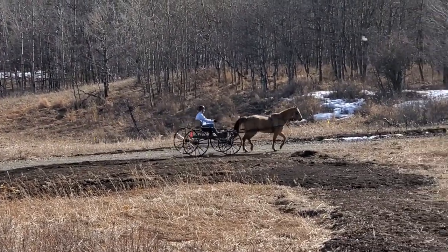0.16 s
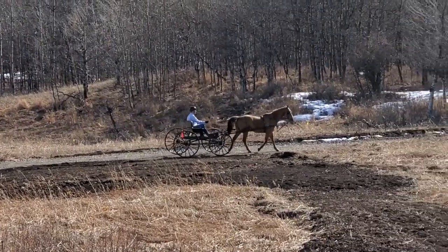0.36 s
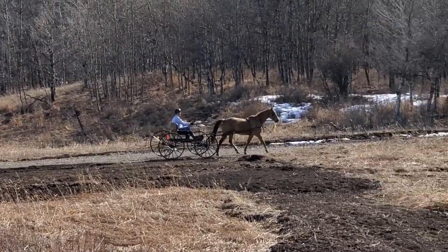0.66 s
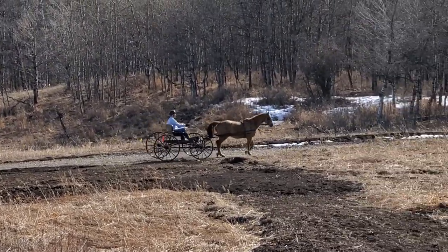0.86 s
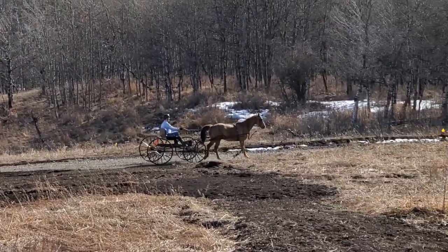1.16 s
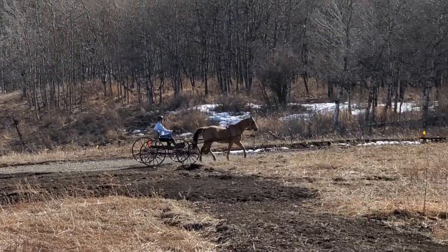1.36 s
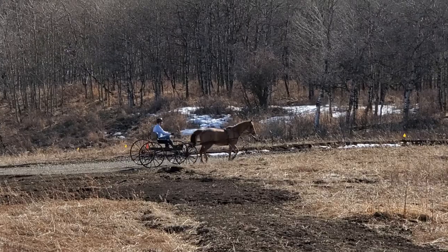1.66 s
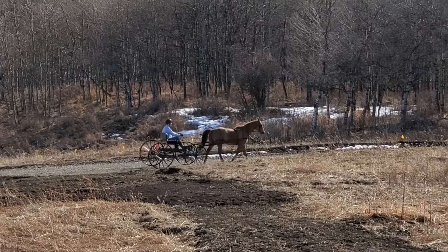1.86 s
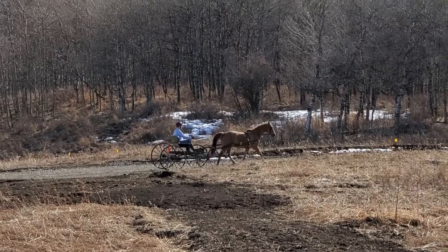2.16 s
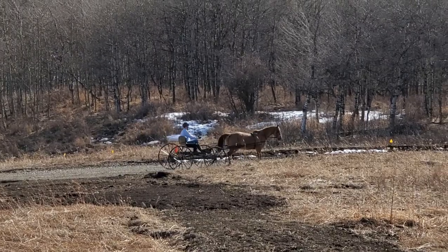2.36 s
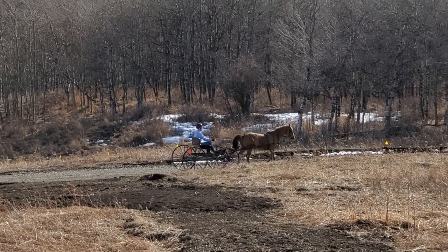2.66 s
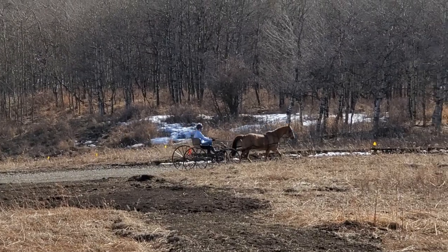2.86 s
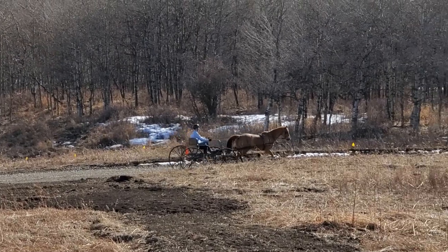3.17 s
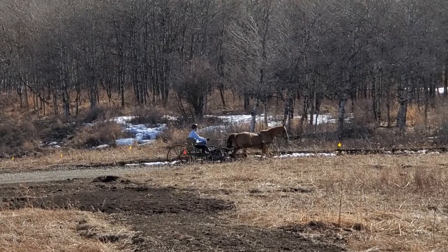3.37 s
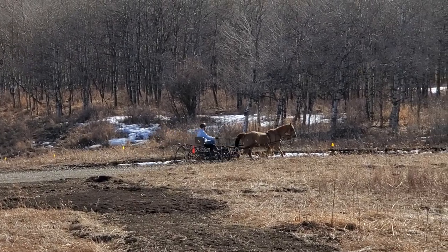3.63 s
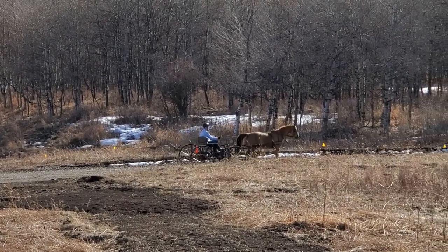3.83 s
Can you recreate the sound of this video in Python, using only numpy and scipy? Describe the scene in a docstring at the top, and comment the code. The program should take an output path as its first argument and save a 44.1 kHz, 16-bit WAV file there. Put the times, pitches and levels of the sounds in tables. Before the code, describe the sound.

Gusty wind rumbles on the microphone while a distant horse pulls a buggy along gravel.

```python
"""Wind buffets the left and right microphone ports with deep thumps and flutter, while some way off
a horse trots along a gravel road, drawing a light buggy. Hooves crush the stones and ring their iron
shoes, the wheels crunch steadily and loose fittings clink. The woods rush behind, a late gust stirs
the dry grass, a few stalks tick close by and the microphones add a faint hiss."""
import sys
import numpy as np
from scipy import signal
from scipy.fft import rfft, irfft, next_fast_len
from scipy.io import wavfile
from scipy.ndimage import uniform_filter1d, map_coordinates

SR = 44100
rng = np.random.default_rng(int(sys.argv[2]) if len(sys.argv) > 2 else 0)


def int16_out(signal):
    """Quantize to a 16-bit WAV file."""
    q = np.round(np.clip(np.atleast_2d(signal).T, -1, 1) * 32767)
    wavfile.write(sys.argv[1], SR, q.astype(np.int16))


N = 176400

# hooves striking and scuffing the gravel (time [s], level [dB], length [s])
FOOTFALLS = [(.342, -73, 0.0095), (0.612, -66.5, 0.017), (0.762, -65, 0.016), (1.093, -63.5, 0.018),
             (1.131, -66, 0.027), (1.544, -68.5, 0.017), (1.711, -66, 0.016), (1.733, -52, 0.0096),
             (1.744, -51, 0.0068), (1.777, -60, 0.0078), (1.882, -67.5, 0.0062), (2.031, -60, 0.006),
             (2.084, -65.5, 0.036), (2.202, -65, 0.016), (2.228, -56.5, 0.015), (2.262, -60, 0.011),
             (2.29, -62.5, 0.0075), (2.406, -63.5, 0.017), (2.55, -55, 0.0029), (2.602, -62, 0.017),
             (2.811, -67, 0.024), (3.19, -84, 0.0035), (3.311, -66, 0.0079), (3.775, -62.5, 0.029)]
HOOF_ATTACK_S = .0035


def amp(db):
    """Decibels to gain."""
    return 10 ** (np.asarray(db) / 20)


def unit(x):
    """Scale to rms 1."""
    return x / np.sqrt(np.mean(x ** 2) + 1e-20)


def along(points, hz):
    """Read (frequency, value) points on a log frequency axis."""
    freqs, values = np.transpose(points)
    return np.interp(np.log(hz + 1), np.log(freqs + 1), values)


def curve(rows):
    """An envelope through (time, value) points, one value per sample."""
    return np.interp(np.arange(N) / SR, *np.transpose(rows))


def wobble(per_s):
    """A smooth random curve with per_s knots a second."""
    return map_coordinates(rng.standard_normal(2048), [np.arange(N) * per_s / SR], mode="wrap")


def filtered(x, response):
    """Equalise x by a gain given as a function of frequency."""
    size = next_fast_len(N + SR // 4)
    return irfft(rfft(x, size) * response(np.fft.rfftfreq(size, 1 / SR)), size)[..., :N]


def noise(colour):
    """Coloured noise, rms 1."""
    return unit(filtered(rng.standard_normal(N), lambda hz: amp(along(colour, hz))))


def white_pair():
    """Two unrelated white noises."""
    return rng.standard_normal((2, N))


def stereo(pair, colour, correlation):
    """Colour two unrelated signals and blend them as mid and side into left and right, rms 1."""
    def response(hz):
        angle = np.arccos(np.clip(along(correlation, hz), -1, 1)) / 2
        return amp(along(colour, hz)) * np.array([np.cos(angle), np.sin(angle)])
    mid, side = filtered(pair, response)
    return unit(np.array([mid + side, mid - side]))


def patchy(pair, depth_db, size=1024, frames=14):
    """Mottle a pair of signals with patches of gain that drift in time and frequency."""
    spectra = signal.stft(pair, nperseg=size)[2]
    patches = uniform_filter1d(rng.standard_normal(spectra.shape[1:]), size=5, axis=0)
    patches = uniform_filter1d(patches, size=frames, axis=1)
    return signal.istft(spectra * amp(depth_db * unit(patches)), nperseg=size)[1][:, :N]


def hiss():
    """Faint microphone hiss swells and sinks, coloured differently on each side."""
    # swell shared by both sides (time [s], level [dB])
    swell = [(0, -83), (.22, -78), (.3, -80), (.57, -82), (.65, -79), (1.4, -77.5), (1.68, -84),
             (1.92, -81.5), (2.0, -76), (2.15, -80), (2.55, -78), (2.8, -81.5), (3.25, -75.5),
             (3.55, -78.5), (3.65, -74), (3.82, -74), (3.92, -78)]
    # tone of each side (frequency [Hz], gain [dB])
    left_colour = [(4000, -27), (7500, -11), (10000, -6), (13000, -3.5), (15500, 3.5)]
    right_colour = [(4000, -42), (8000, -36), (9800, -29), (10600, 0), (11300, -0.5), (12200, -12),
                    (15500, -15.5)]
    sides = np.array([amp(10) * noise(left_colour), amp(3.5) * noise(right_colour)])
    return amp(curve(swell) + .78 * wobble(18)) * sides


def woods():
    """The far woods rush, a little to the left, with a hollow note that comes and goes."""
    # swells of the breathy rush and of the hollow note (time [s], level [dB])
    rush_swell = [(0, -61), (.25, -56.5), (.52, -60), (.82, -59.5), (.91, -66), (1.08, -58.5), (1.25, -61),
                  (1.38, -58), (1.7, -62), (1.82, -59.5), (1.94, -65), (2.08, -55.5), (2.17, -60.5),
                  (2.55, -60.5), (2.7, -65), (2.95, -61.5), (3.8, -62.5), (4, -63.5)]
    hollow_swell = [(0, -59), (.5, -75), (1.05, -67.5), (1.9, -63.5), (2.15, -68), (2.45, -62), (2.75, -69),
                    (3.15, -61.5), (3.8, -59), (4, -65)]
    # their tone (frequency [Hz], gain [dB])
    rush_colour = [(150, -6), (300, -12), (420, -22.5), (520, -13), (620, -4), (725, 1.5), (820, -1.5),
                   (1000, -4), (1200, -9.5), (1450, -19.5), (2400, -39), (5000, -53)]
    hollow_colour = [(300, -69), (500, -9), (580, -0.5), (635, 6), (690, 2.5), (760, -33.5), (1100, -37.5)]
    # stereo image of both (frequency [Hz], left-right correlation [-1..1])
    image = [(400, 0.64), (700, 0.97), (900, 0.45), (1050, 0.38), (1300, -0.55), (2000, 0.24), (2500, .3)]
    rush = amp(curve(rush_swell) + .5) * stereo(patchy(white_pair(), depth_db=1.5), rush_colour, image)
    hollow = amp(curve(hollow_swell)) * stereo(white_pair(), hollow_colour, image)
    return (rush + hollow) * amp([[.75], [-.75]])


def grass():
    """Dry grass rustles, most of all in the late gust."""
    # swell of the rustle (time [s], level [dB])
    swell = [(0, -81.5), (.6, -66), (1.6, -77), (2.6, -65.5), (3.0, -59.5), (3.3, -59.5), (3.5, -64.5),
             (3.8, -59.5), (4, -64.5)]
    # its tone (frequency [Hz], gain [dB])
    colour = [(500, -5.5), (1050, 2), (1350, -2), (1750, -2), (2300, -20.5), (3200, -30.5), (6000, -17.5),
              (10000, -40)]
    # its stereo image (frequency [Hz], left-right correlation [-1..1])
    image = [(900, -0.33), (1300, -0.49), (1800, -0.059), (2400, 0.58), (4000, -0.046)]
    envelope = amp(curve(swell) + .71 * wobble(30))
    return envelope * stereo(patchy(white_pair(), depth_db=2.96), colour, image)


def stalks():
    """Stalks tick near the microphones: thin, dry snaps of band-passed noise."""
    # snaps (time [s], level [dB], pitch [Hz])
    snaps = [(0.185, -62.5, 11000), (0.61, -64, 10500), (0.763, -57.5, 5000), (2.232, -65.5, 7300),
             (2.407, -62, 5800), (3.612, -61, 4700), (3.653, -61, 4760), (3.782, -60, 6070)]
    t60_s, width_oct = .057, .39
    out = np.zeros((2, N))
    for start, db, pitch_hz in snaps:
        t = np.arange(N) / SR - start
        band = lambda hz: np.exp(-.5 * (np.log2((hz + 1) / pitch_hz) / width_oct) ** 2)
        out += (t > 0) * amp(db - 60 * np.abs(t) / t60_s) * unit(filtered(white_pair(), band))
    return out


def eddies(colour):
    """Low turbulence, compressed to a nearly even strength, rms 1."""
    rumble = noise(colour)
    power = uniform_filter1d(np.abs(signal.hilbert(rumble)) ** 2, size=900)
    power = np.abs(uniform_filter1d(power, size=900))
    return unit(rumble / np.sqrt(power + .23))


def wind():
    """Wind flickers on each port and puffs slap it; the harder it blows, the more flutter over the thump."""
    # wind strength on each port (time [s], level [dB])
    left_gusts = [(0, -54.5), (.09, -43), (.24, -52), (.31, -62), (.42, -42.5), (.52, -52.5), (.56, -34),
                  (.62, -44), (.74, -31.5), (.88, -56), (1.0, -46), (1.06, -19), (1.13, -27.5),
                  (1.19, -52.5), (1.46, -53), (1.57, -41.5), (1.68, -50), (1.85, -62.5), (1.92, -44.5),
                  (2.15, -79), (2.22, -39), (2.38, -34.5), (2.57, -38), (2.85, -47), (2.94, -33.5),
                  (3.38, -26), (3.58, -52), (3.63, -42), (3.8, -36.5), (4, -43.5)]
    right_gusts = [(0, -63), (.24, -40), (.3, -45), (.5, -55.5), (.68, -49), (.73, -32), (.93, -65),
                   (.99, -28.5), (1.04, -20.5), (1.08, -31.5), (1.2, -37), (1.3, -48), (1.86, -54.5),
                   (2.06, -36), (2.18, -44.5), (2.34, -38.5), (2.4, -40.5), (2.62, -44), (2.84, -46.5),
                   (2.9, -31), (3.3, -30.5), (3.52, -40), (3.7, -33.5), (4, -51)]
    # sudden puffs (peak time [s], half-width [s], level [dB], port [-1 left, 1 right])
    puffs = [(.075, 0.01, -36.5, -1), (0.174, 0.007, -34, -1), (0.707, 0.0057, -26.5, -1),
             (1.026, 0.016, -21, 1), (2.067, 0.0083, -28, 1), (2.335, 0.011, -22.5, -1),
             (2.38, 0.014, -15, -1), (2.466, 0.007, -28, 1), (2.593, 0.021, -31, -1),
             (2.972, 0.028, -24.5, -1), (3.038, 0.006, -20, -1), (3.093, 0.011, -18, -1),
             (3.247, 0.016, -20, -1), (3.3, 0.021, -25.5, -1), (3.413, 0.014, -20, -1),
             (3.564, 0.013, -27, 1), (3.708, 0.0054, -20, 1), (3.786, 0.023, -24.5, -1)]
    # tone of the deep thump and of the flutter (frequency [Hz], gain [dB])
    thump_colour = [(12, -59), (25, -20.5), (52, 3), (80, 4), (112, -5.5), (145, -25), (250, -33),
                    (450, -50), (900, -94)]
    flutter_colour = [(60, -40), (110, 3.5), (175, 0.5), (250, -15), (330, -19), (420, -30.5), (650, -35.5),
                      (1500, -98)]
    flicker_db, knee_db, flutter_slope = 3, -20, 1.78
    ports = []
    for side, gusts in (-1, left_gusts), (1, right_gusts):
        power = amp(curve(gusts) + flicker_db * np.clip(wobble(26), -2, 1)) ** 2
        for peak, width, db, port in puffs:
            if port == side:
                power += amp(db) ** 2 * np.exp(-((np.arange(N) / SR - peak) / width) ** 2)
        level_db = 10 * np.log10(power)
        thump_db = np.minimum(level_db, knee_db) - 1  # above the knee only the flutter grows
        flutter_db = knee_db - 12 + flutter_slope * (level_db - knee_db)
        ports.append(amp(thump_db) * eddies(thump_colour) + amp(flutter_db) * eddies(flutter_colour))
    return np.array(ports)


def tree_echo(x, t60_s=.2):
    """The tree line scatters back a short tail."""
    t = np.arange(SR // 2) / SR
    tail = rng.standard_normal((2, len(t))) * amp(-60 * t / t60_s)
    return signal.fftconvolve(x, tail / np.linalg.norm(tail[0]), axes=1)[:, :N]


def fittings():
    """Loose metal on the harness and buggy touches and rings briefly."""
    # clinks (time [s], level [dB], pitch [Hz])
    clinks = [(1.127, -54, 2096), (2.436, -53, 2030), (2.494, -50.5, 2120), (2.719, -52, 2570),
              (2.786, -60.5, 3940), (2.806, -58, 2660), (2.811, -56, 1817)]
    attack_s, t60_s = .003, .06
    out, t = np.zeros(N + SR), np.arange(SR // 4) / SR
    for start, db, pitch_hz in clinks:
        phase_drift = np.cumsum(rng.normal(0, .042, len(t)))  # roughens the pure tone
        envelope = amp(db - 60 * t / t60_s) * (1 - np.exp(-t / attack_s))
        out[round(start * SR):][:len(t)] += envelope * np.sin(2 * np.pi * pitch_hz * t + phase_drift)
    return out[:N]


def gravel(colour, per_s, spread_db):
    """Countless stones click together, each cluster with its own colour, rms 1."""
    # stereo image of the stones (frequency [Hz], left-right correlation [-1..1])
    image = [(1300, -0.015), (2400, 0.56), (3400, -0.065), (4100, 0.31), (5500, 0.078), (6700, -0.42),
             (9000, -0.34)]
    # their panning (frequency [Hz], left minus right [dB])
    balance = [(1300, -2), (2400, 5.5), (3200, -1.5), (4000, 5.5), (4700, -6), (6500, -1), (9000, -2)]
    clicks = (rng.random((2, N)) < per_s / SR) * rng.choice([-1, 1], (2, N))
    sizes = amp(spread_db * np.clip(white_pair(), -2, 2))
    clusters = patchy(clicks * sizes, depth_db=2.5, size=512, frames=4)
    pan = lambda hz: amp(np.outer([.5, -.5], along(balance, hz)))
    return unit(filtered(stereo(clusters, colour, image), pan))


def pebbles():
    """Single pebbles clink under the rims, each at its own pitch, rms 1."""
    per_s, centre_hz, spread_oct, spread_db, decay_cycles = 90, 2700, .45, 4, 17
    out, t = np.zeros((2, N + 2048)), np.arange(2048) / SR
    gap_draws, phases = rng.random((1500, 2)).T
    traits = np.clip(rng.standard_normal((1500, 3)), -2, 2)
    starts = np.cumsum(-np.log(gap_draws)) / per_s
    for start, phase, (pitch, size, skew) in zip(starts, phases, traits):
        if start < N / SR:
            cycles = t * centre_hz * 2 ** (spread_oct * pitch)
            ring = np.sin(2 * np.pi * (cycles + phase) + np.array([[.5], [-.5]]) * skew)
            envelope = np.exp(-cycles / decay_cycles) * (1 - np.exp(-cycles))
            out[:, int(start * SR):][:, :len(t)] += amp(spread_db * size) * envelope * ring
    return unit(out[:, :N])


def wheels():
    """The rims grind over the gravel in uneven little surges: crunch, clinking pebbles and fine grit."""
    # swells of the coarse crunch and of the hissing grit (time [s], level [dB])
    crunch_swell = [(0, -94), (.45, -87), (.65, -87), (.8, -71.5), (1.0, -83), (1.15, -70), (1.45, -75),
                    (1.67, -75.5), (1.8, -68.5), (1.95, -69), (2.08, -67), (2.18, -76), (2.28, -69.5),
                    (2.6, -71), (3.0, -73), (4, -80.5)]
    grit_swell = [(0, -79.5), (.45, -73.5), (.8, -67), (1.0, -70), (1.35, -68), (1.65, -75.5), (2.1, -71.5),
                  (2.6, -68.5), (3.1, -88.5), (4, -77)]
    # their tone (frequency [Hz], gain [dB])
    crunch_colour = [(700, -28), (1300, 0.5), (1600, 6), (1900, 3), (2400, 4.5), (2800, 1.5), (3350, -11.5),
                     (4050, -1), (5000, -8.5), (6300, -14), (7500, -14), (10000, -11.5), (15000, -24)]
    grit_colour = [(1500, -15), (2600, -5), (3250, -5.5), (4200, -3.5), (5200, -5.5), (6300, -4),
                   (7500, -17.5), (10000, -42), (15000, -44)]
    surge_db = 1.74 * unit(wobble(33.84) + wobble(170))
    crunch = gravel(crunch_colour, per_s=2000, spread_db=1) + amp(-7.5) * pebbles()
    grit_db = curve(grit_swell) + .5 * surge_db + wobble(29.9)
    grit = gravel(grit_colour, per_s=6000, spread_db=3)
    return amp(curve(crunch_swell) + surge_db) * crunch + amp(grit_db) * grit


def shoes():
    """Every footfall rings the iron shoe a little, never quite the same way twice."""
    # modes of iron on stone (frequency [Hz], relative level [dB], decay t60 [s])
    modes = [(1583, 0, .07), (2132, 2, .065), (2440, -1, .07), (2800, -5, .05), (4100, -6, .05)]
    out, t = np.zeros(N + SR), np.arange(SR // 5) / SR
    for start, db, _ in FOOTFALLS:
        ring = np.zeros(len(t))
        for hz, mode_db, t60_s in modes:
            decay = amp(mode_db + rng.normal(0, 2) - 60 * t / t60_s)
            ring += decay * np.sin(2 * np.pi * (hz * rng.normal(1, .005) * t + rng.random()))
        out[round(start * SR):][:len(t)] += amp(db - 2) * np.clip(t / HOOF_ATTACK_S, 0, 1) * ring
    return out[:N]


def hooves():
    """Each hoof crushes the stones briefly, and loose ones scatter after it."""
    # tone of the crushed stones (frequency [Hz], gain [dB])
    colour = [(600, -35), (1300, -1), (1570, -10.5), (1850, 1.5), (2150, -7), (2750, 2), (3400, -8),
              (4000, -3.5), (5600, -10), (7500, -21), (9300, -34), (14000, -31)]
    crush_t60_s, scatter_t60_s, scatter_db = .032, .16, -16
    power = np.zeros(N)
    for start, db, length in FOOTFALLS:
        t = np.arange(N) / SR - start
        after = np.maximum(t - length, 0)
        release = amp(-60 * after / crush_t60_s) + amp(scatter_db - 60 * after / scatter_t60_s)
        power += (amp(db) * np.clip(t / HOOF_ATTACK_S, 0, 1) * release) ** 2
    return np.sqrt(power) * gravel(colour, per_s=6100, spread_db=8)


def scene():
    """Horse and buggy in the windy open; only the sounds of the road echo."""
    road = wheels() + hooves() + shoes() + fittings()
    return road + wind() + amp(-15) * tree_echo(road) + woods() + grass() + stalks() + hiss()


def record(dry, top_hz=15800):
    """A brick-wall low-pass cuts the highest treble."""
    return filtered(dry, lambda hz: hz < top_hz)


dry = scene()
out = record(dry)
int16_out(out)
```